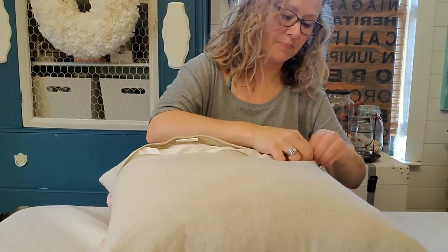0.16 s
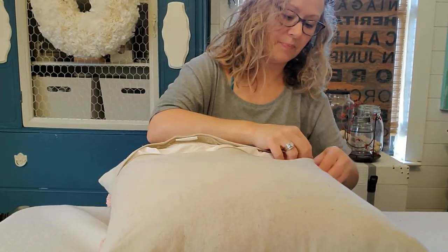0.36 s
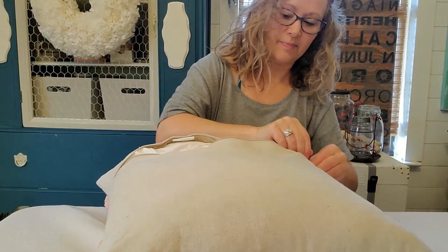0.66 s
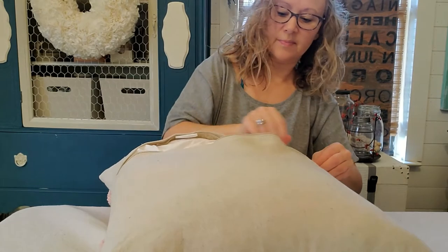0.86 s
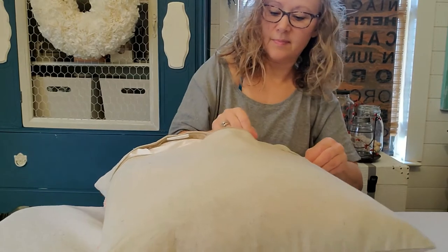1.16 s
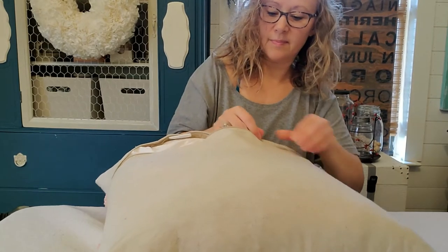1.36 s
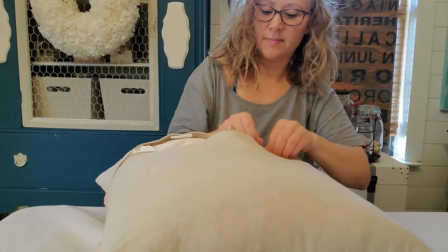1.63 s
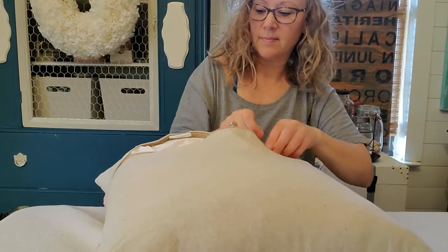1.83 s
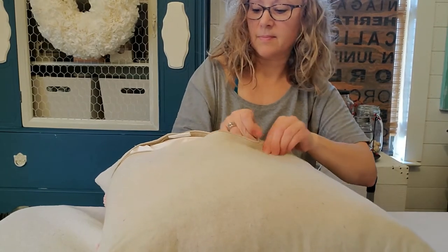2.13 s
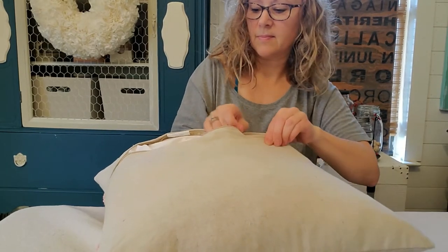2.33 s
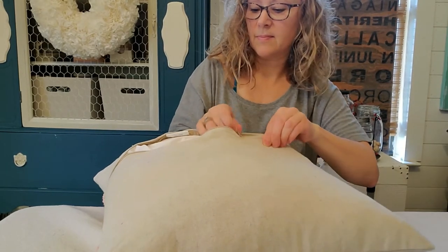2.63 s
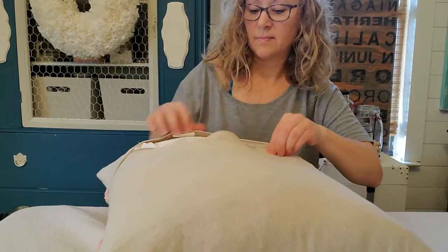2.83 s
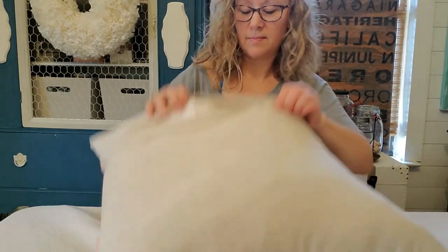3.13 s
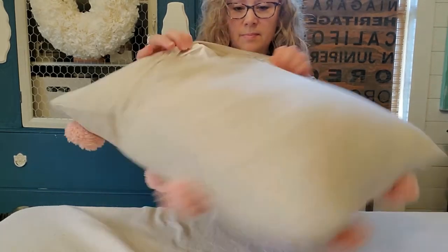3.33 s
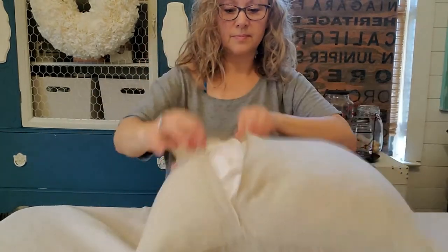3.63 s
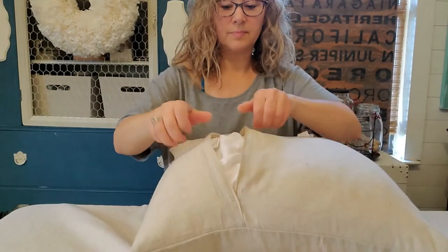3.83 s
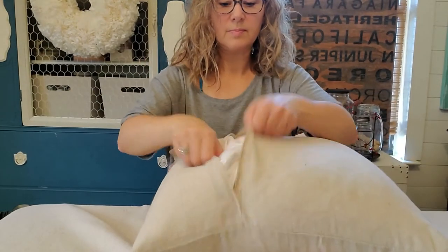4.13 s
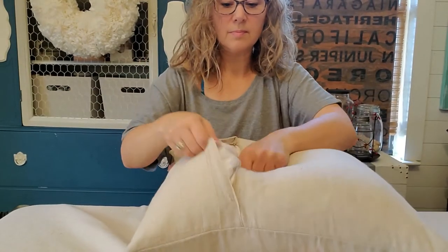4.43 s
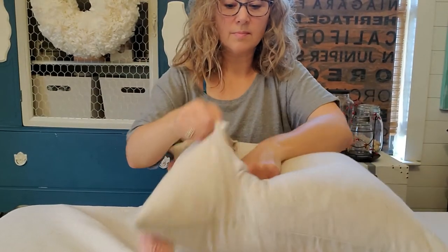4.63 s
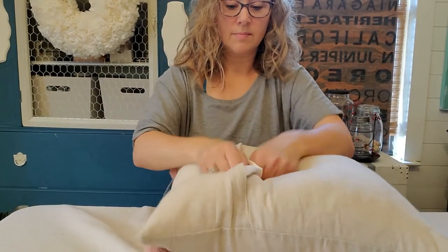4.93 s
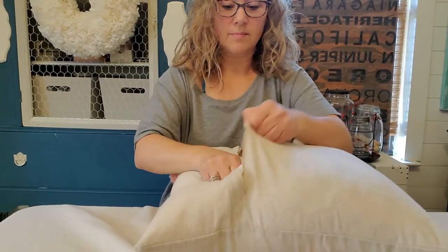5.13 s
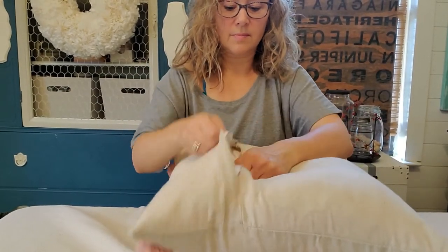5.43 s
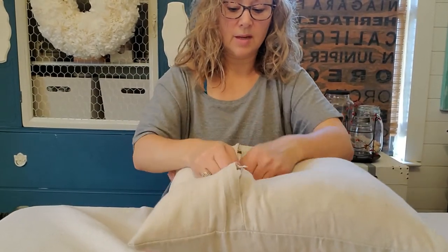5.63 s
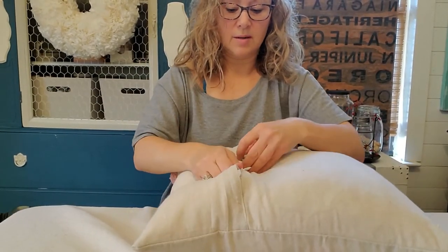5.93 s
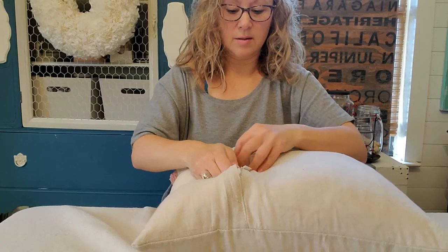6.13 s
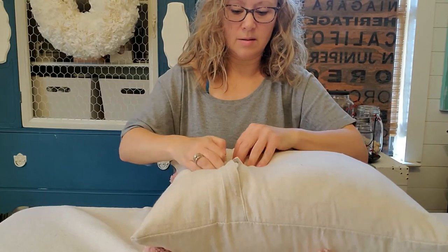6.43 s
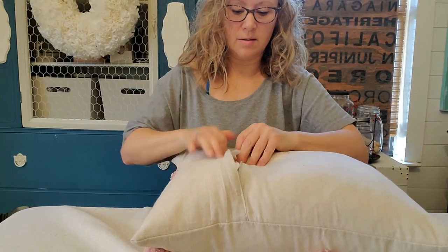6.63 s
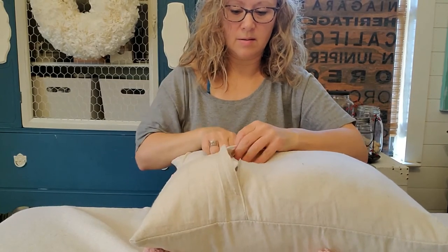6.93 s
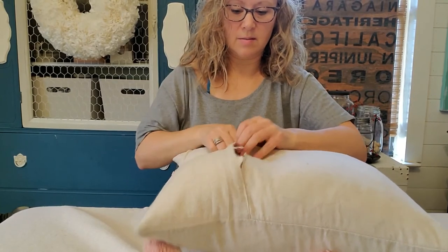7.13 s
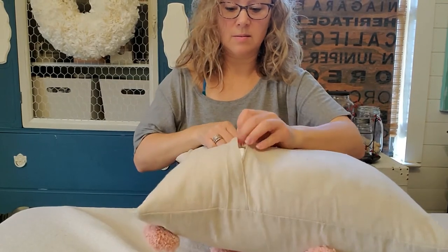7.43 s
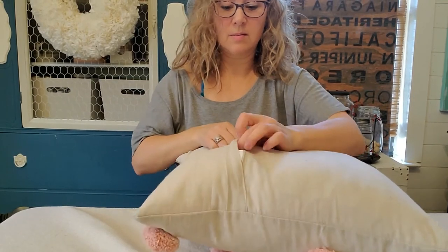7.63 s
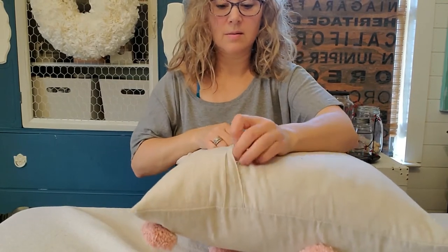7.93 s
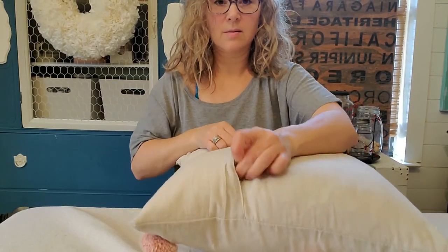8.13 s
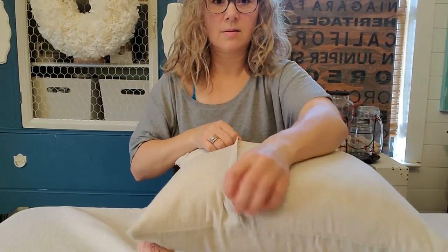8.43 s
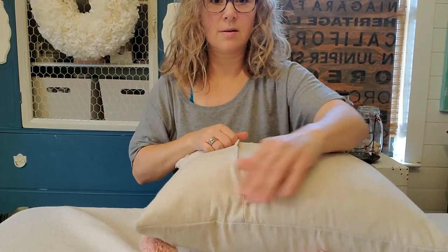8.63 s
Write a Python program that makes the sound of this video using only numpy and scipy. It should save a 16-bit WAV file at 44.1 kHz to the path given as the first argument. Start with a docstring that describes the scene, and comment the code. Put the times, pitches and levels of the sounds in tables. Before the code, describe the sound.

Close to the microphone in a small quiet room, a zipper on a stuffed pillow cover zips in a quick rising stroke, then short stuttering tugs. The pillow drops on a table with a deep, soft thump and puff of air. Hands rub, pat and tick at the fabric, then three more short zips follow, ending with a muffled pat and brushing sweep.

```python
"""A zipper on a stuffed pillow cover is pulled shut in short strokes, in a small room.
Each tooth clicks in the slider and plucks the taut cloth; a fast, even pull also sings at the tooth rate.
Hands hiss and rub over the cover as shaped noise, folds rustle as narrow noise bands, pats are decaying sines.
At 3.6 s the pillow drops on the table, whose modes boom; a faint hum and moving air lie behind."""
import sys
import numpy as np
from scipy import signal
from scipy.fft import rfft, irfft, next_fast_len
from scipy.io import wavfile
from scipy.ndimage import map_coordinates

SR = 44100
rng = np.random.default_rng(int(sys.argv[2]) if len(sys.argv) > 2 else 0)


def generate_wav(sig):
    """Save sig (samples, or channels by samples) to the path in sys.argv[1] as 16-bit PCM at SR."""
    pcm = np.round(np.clip(np.atleast_2d(sig).T, -1, 1) * 32767).astype(np.int16)
    wavfile.write(sys.argv[1], SR, pcm)


N = 386316

# colour of the clicking teeth and tab: (frequency [Hz], level [dB])
TEETH_COLOUR = [(200, -6.5), (900, 3.5), (1800, -5), (2600, -3), (3900, 1), (5000, -3.5), (6500, -3.5),
                (8200, -8), (12500, -5), (16000, -12.5)]
# colour of air and cloth brushed by a blow: (frequency [Hz], level [dB])
PUFF_COLOUR = [(40, -3), (170, -2.5), (420, 0), (700, -8.5), (1500, -21), (4000, -27), (9000, -28.5),
               (16000, -37)]
GRAB_S = 0.0081  # the slider starts and stops within this time


def amp(db):
    """Decibels to gain."""
    return 10 ** (np.asarray(db) / 20)


def unit(x):
    """x at rms 1."""
    return x / np.sqrt(np.mean(x ** 2) + 1e-20)


def along(points, hz):
    """(Hz, value) points interpolated on a log frequency axis."""
    f, v = np.transpose(points)
    return np.interp(np.log(hz + 1), np.log(f + 1), v)


def curves(rows):
    """One value per sample for each column after the time."""
    s, *cols = np.transpose(rows)
    return [np.interp(np.arange(N) / SR, s, c) for c in cols]


def wobble(rate_hz):
    """A smooth random curve with rate_hz knots a second."""
    knots = rng.standard_normal(int(N * rate_hz / SR) + 4)
    return map_coordinates(knots, [np.arange(N) * rate_hz / SR])


def add(track, s, sound):
    """Mix a sound into a track from time s."""
    part = track[round(s * SR):][:len(sound)]
    part += sound[:len(part)]


def coloured(x, spectrum, size=4096):
    """x through a minimum-phase filter of energy 1 with the given spectrum."""
    cepstrum = irfft(np.log(amp(along(spectrum, np.fft.rfftfreq(size, 1 / SR)))))
    cepstrum[1:size // 2] *= 2  # fold onto the causal half
    cepstrum[size // 2 + 1:] = 0
    kernel = irfft(np.exp(rfft(cepstrum)))
    return signal.oaconvolve(x, kernel / np.linalg.norm(kernel))[:len(x)]


def noise(spectrum):
    """Coloured noise of rms 1."""
    return coloured(rng.standard_normal(N), spectrum)


def split(x, edge_hz):
    """The parts of x below and above an edge."""
    low = signal.sosfiltfilt(signal.butter(2, edge_hz, fs=SR, output="sos"), x)
    return low, x - low


def pulses(at, sizes):
    """Impulses at fractional sample positions (windowed sinc)."""
    taps = np.floor(at)[:, None].astype(int) + np.arange(16) - 7
    offset = taps - at[:, None]
    shape = np.sinc(offset) * np.sinc(offset / 8)
    return np.bincount(np.clip(taps, 0, N - 1).ravel(), (sizes[:, None] * shape).ravel(), N)


def diffuse(pair):
    """Two unrelated signals as they reach the microphones from all sides: alike in the bass only."""
    # left-right likeness: (frequency [Hz], correlation [0-1])
    likeness = [(100, 0.92), (250, 0.92), (500, 0.75), (1000, 0.16), (3000, 0)]
    length = pair.shape[1]
    m = next_fast_len(length)
    turn = np.arccos(np.clip(along(likeness, np.fft.rfftfreq(m, 1 / SR)), -1, 1)) / 2
    mid, side = irfft(rfft(pair, m) * [np.cos(turn), np.sin(turn)], m)[:, :length]
    return np.array([mid + side, mid - side])


def diffuse_noise(spectrum):
    """Coloured noise from all sides."""
    return diffuse(np.array([noise(spectrum), noise(spectrum)]))


def room(x, wet_db, early_db=6, early_t60_s=0.0082):
    """Direct sound, dense early reflections and a short tail, drawn anew for each short part."""
    # decay of the tail: (frequency [Hz], t60 [s])
    walls = [(100, 0.35), (400, 0.33), (1500, 0.35), (4000, 0.34), (14000, 0.27)]
    out, hop = np.zeros((2, N)), SR // 12
    hz, t, z = signal.stft(rng.standard_normal((2, 3 * SR)), SR, nperseg=256)
    t = t[t < .25]
    decay = amp(-60 * t / along(walls, hz)[:, None]) + amp(early_db - 60 * t / early_t60_s)
    fade = np.sin(np.pi * np.arange(2 * hop) / (2 * hop))
    for start in range(0, N - hop // 2, hop):
        part = x[start:start + 2 * hop]
        pick = rng.integers(z.shape[2] - len(t))
        if np.abs(part).max() < 1e-5:
            continue
        tail = diffuse(signal.istft(z[..., pick:pick + len(t)] * decay, SR, nperseg=256)[1])
        tail *= 1 - np.exp(-np.arange(tail.shape[1]) / SR / 0.00095)
        tail /= np.linalg.norm(tail, axis=1, keepdims=True)
        for ear, answer in zip(out, tail):
            add(ear, start / SR, signal.fftconvolve(part * fade[:len(part)], answer))
    return x + amp(wet_db) * out


def placed(pair):
    """The sound reaches the nearer microphone first."""
    # hands along the seam: (time [s], lead of the left microphone [s])
    hands = [(.8, -.00005), (2.2, -.00003), (3, .00007), (7.1, .00002)]
    lead_s, = curves(hands)
    now, shift = np.arange(N), lead_s * SR / 2
    left = map_coordinates(pair[0], [now + shift])
    right = map_coordinates(pair[1], [now - shift])
    return np.array([left, right])


def slips(rows, width_octaves, grain_db):
    """Short swells of stick and slip: grainy noise in a band at each fold's pitch."""
    out, grit = np.zeros(N), rng.standard_normal(N) * amp(grain_db * wobble(600))
    for s, length_s, db, hz in rows:
        edges_hz = hz * 2 ** (np.array([-.5, .5]) * width_octaves)
        band = signal.butter(2, edges_hz, "bandpass", fs=SR, output="sos")
        begin = s - length_s / 2
        part = signal.sosfilt(band, grit[round(begin * SR):][:round(length_s * SR)])
        add(out, begin, amp(db) * unit(part * np.hanning(len(part))))
    return out


def room_tone(hum_hz=121.3, hum_db=-65, air_db=-63):
    """Faint moving air and the wavering hum of an appliance."""
    # colour of the air: (frequency [Hz], level [dB])
    air_colour = [(25, -18), (60, -3.5), (110, 18), (165, -11), (280, -13), (600, -37), (1200, -10.5),
                  (2800, -41), (4500, -29), (7000, -19.5), (9000, -28), (16000, -42)]
    hum = np.sin(2 * np.pi * hum_hz * np.arange(N) / SR + .4 * wobble(5))
    return amp(air_db) * diffuse_noise(air_colour) + amp(hum_db) * hum


def sweeping():
    """Each sweep of a hand swells and fades: the gains of its hiss and of its rubbing."""
    # hand sweeps: (fastest moment [s], rise [s], fall [s], hiss level [dB])
    sweeps = [(0.56, 0.16, 0.32, -60.5), (1.22, 0.066, 0.073, -67), (1.95, 0.22, 0.12, -64),
              (2.78, 0.068, 0.1, -58.5), (3.162, 0.16, 0.088, -50.5), (3.34, 0.063, 0.075, -59),
              (3.54, 0.08, 0.17, -60), (3.78, 0.15, 0.033, -60), (4.019, 0.056, 0.061, -53.5),
              (4.19, 0.23, 0.11, -51), (4.389, 0.07, 0.1, -47.5), (4.635, 0.085, 0.094, -46.5),
              (4.98, 0.22, 0.21, -50.5), (5.37, 0.12, 0.097, -51.5), (5.69, 0.18, 0.17, -54),
              (6.271, 0.25, 0.097, -57), (6.6, 0.14, 0.31, -61.5), (6.92, 0.26, 1, -65),
              (8.15, 0.095, 0.16, -51), (8.68, 0.14, 0.062, -44)]
    shape = 1.53  # 1 is a pointed swell, 2 a rounded one
    rub_mean_db, rub_follows = -61, 0.54  # rub of an average sweep; its share of the hiss's change in dB
    rub_outlasts = 1.28  # the stuffing gives for this many times as long as the hand slides
    rest_hiss_db, rest_rub_db = -74, -69  # resting hands are never quite still
    t = np.arange(0, N, 64) / SR
    hiss_power, rub_power = amp(rest_hiss_db) ** 2, amp(rest_rub_db) ** 2
    average_db = np.mean(np.transpose(sweeps)[-1])
    for s, rise_s, fall_s, hiss_db in sweeps:
        rub_db = rub_mean_db + rub_follows * (hiss_db - average_db)
        away = np.maximum((s - t) / rise_s, (t - s) / fall_s)
        hiss_power = hiss_power + (amp(hiss_db) * np.exp(-away ** shape)) ** 2
        rub_power = rub_power + (amp(rub_db) * np.exp(-(away / rub_outlasts) ** shape)) ** 2
    return curves(np.transpose([t, np.sqrt(hiss_power), np.sqrt(rub_power)]))


def creases(per_s=22, scatter_db=4):
    """Small folds of the cover snap over at random, as decaying noise bursts; rms 1."""
    # colour of a snapping fold: (frequency [Hz], level [dB])
    crease_colour = [(300, -17), (1500, -5.5), (3200, -9.5), (5500, -6), (9000, -9.5), (16000, -14.5)]
    count = int(per_s * N / SR)
    sizes = amp(scatter_db * np.clip(rng.standard_normal(count), -2, 2))
    snaps = np.bincount(rng.integers(N, size=count), sizes, N)
    t = np.arange(SR // 20) / SR
    flutter = rng.standard_normal(len(t)) * amp(-60 * t / 0.034)
    return unit(coloured(signal.oaconvolve(snaps, flutter)[:N], crease_colour))


def cloth(fibre_db=2.0, flutter_db=1.4, direct_db=-9, crease_db=-10):
    """Skin slides over the weave: a hiss of catching fibres above a dull, uneven rubbing."""
    # colour of the fibres: (frequency [Hz], level [dB])
    hiss_colour = [(200, -2.5), (700, 1.5), (1400, 0), (2000, 1), (3100, 0), (5000, -2), (7000, -2.5),
                   (9000, -6.5), (13000, -6), (16000, -10)]
    # colour of the rubbing: (frequency [Hz], level [dB])
    rub_colour = [(30, -21.5), (60, 3), (140, 4), (230, 2.5), (480, -0.5), (800, -8.5), (1500, -15),
                  (6000, -74)]
    sliding, pressing = sweeping()
    fibres = coloured(unit(rng.standard_normal(N) * amp(fibre_db * wobble(900))), hiss_colour)
    hiss = amp(direct_db) * fibres + diffuse_noise(hiss_colour) + amp(crease_db) * creases()
    rub = diffuse_noise(rub_colour)
    grip_db = flutter_db * wobble(35)
    lumps_db = 2.2 * wobble(25)
    return sliding * amp(grip_db) * hiss + pressing * amp(4.5 + grip_db + lumps_db) * rub


def rustles():
    """Cloth and zipper tape skid under the fingers by stick and slip."""
    # skids: (middle [s], length [s], level [dB], pitch [Hz])
    skids = [(0.97, 0.16, -43, 3400), (4.536, 0.01, -52.5, 4800), (4.567, 0.027, -54.5, 5300),
             (5.05, 0.17, -65, 3080), (5.491, 0.012, -61, 3230), (7.108, 0.1, -47.5, 4540)]
    return slips(skids, width_octaves=0.58, grain_db=6.0)


def table_ring(attack_s):
    """The table's modes swell under a padded blow and die away."""
    # table modes: (frequency [Hz], level [dB], t60 before any damping [s])
    modes = [(60.7, 3, 0.48), (113, -20, 0.95), (200, -32, 0.67), (385, -14.5, 0.47)]
    t = np.arange(SR) / SR
    ring = sum(amp(db - 60 * t / t60_s) * np.sin(2 * np.pi * hz * t) for hz, db, t60_s in modes)
    return ring * (1 - np.exp(-t / attack_s))


def pats(pat_t60_s=0.035, brush_t60_s=0.13):
    """A pat is a dead knock in the stuffing with a brush of cloth, and stirs the table."""
    # hands pat and press: (time [s], level [dB], pitch [Hz], table boom re level [dB])
    blows = [(0.474, -42.5, 334, -30), (2.624, -44.5, 477, -27), (3.501, -45.5, 171, -21),
             (4.617, -30, 230, -21), (4.948, -35.5, 480, -22), (5.059, -38.5, 418, -16),
             (5.247, -36.5, 194, -17), (5.356, -40, 219, -14.5), (5.721, -43.5, 440, -9.5),
             (5.916, -37.5, 206, -36), (6.146, -38.5, 203, -32), (6.576, -41, 260, -42),
             (6.942, -33, 291, -56), (7.575, -45.5, 243, -31), (8.674, -27, 200.4, -36)]
    out, brush, t = np.zeros(N), np.zeros(N), np.arange(SR) / SR
    rise = 1 - np.exp(-t / 0.0012)
    for s, db, hz, boom_db in blows:
        add(out, s, amp(db - 60 * t / pat_t60_s) * rise * np.sin(2 * np.pi * hz * t))
        # the resting hand damps the table by 37 dB/s
        add(out, s, amp(db + boom_db + 5.0 - 37 * t) * table_ring(attack_s=0.011))
        add(brush, s, amp(db - 11.5 - 60 * t / brush_t60_s) * rise * rng.standard_normal(len(t)))
    return out + coloured(brush, PUFF_COLOUR)


def landing(puff_t60_s=0.35, puff_rise_s=0.03):
    """The pillow's soft pushes set the table booming while air puffs out of the cover."""
    # pillow lands and settles: (time [s], push level [dB], push length [s])
    pushes = [(3.619, -19.5, 0.0019), (3.631, -19.5, 0.0015)]
    out, puff, t = np.zeros(N), np.zeros(N), np.arange(SR) / SR
    for s, db, length_s in pushes:
        u = t / length_s - 4  # push centred on s
        add(out, s - 4 * length_s, amp(db) * (u * u - 1) * np.exp(-u * u / 2))
    touch_s = pushes[0][0] - .003
    add(out, touch_s, amp(-18.0) * table_ring(attack_s=0.036))
    slap = amp(-30.0 - 60 * t / 0.0082)
    sigh = amp(-24.5 - 60 * t / puff_t60_s) * (1 - np.exp(-t / puff_rise_s))
    add(puff, touch_s, (slap + sigh) * rng.standard_normal(len(t)))
    return out + room(coloured(puff, PUFF_COLOUR), wet_db=-2.0)


def tab(tick_t60_s=0.003):
    """Pull tab and fingernails tick: very short cracks of noise."""
    # ticks: (time [s], level [dB])
    ticks = [(1.099, -39), (2.8047, -41), (4.05, -33), (4.212, -36), (4.339, -37), (4.3753, -30),
             (4.4102, -30), (4.6187, -28.5), (6.245, -42), (6.9891, -36), (7.285, -26), (7.983, -34.5),
             (8.522, -56), (8.646, -45)]
    out, t = np.zeros(N), np.arange(SR // 20) / SR
    for s, db in ticks:
        crack = rng.standard_normal(len(t)) * amp(-60 * t / tick_t60_s)
        add(out, s, amp(db + 13.0) * crack / np.linalg.norm(crack))
    return coloured(out, TEETH_COLOUR)


def judders():
    """The cover judders by stick and slip where the pull tugs at it."""
    # tugs: (middle [s], length [s], level [dB], pitch [Hz])
    tugs = [(0.714, 0.052, -41, 250), (0.77, 0.085, -41, 630), (0.91, 0.26, -46.5, 320),
            (1.578, 0.017, -37, 387), (7.17, 0.097, -35.5, 540), (7.625, 0.037, -39.5, 320),
            (7.659, 0.029, -35, 322), (8.238, 0.033, -34.5, 544)]
    return slips(tugs, width_octaves=0.52, grain_db=3.0)


def shaded(x, sizzle_db):
    """Fingers over the slider change the level of its highest sizzle."""
    dull, sizzle = split(x, edge_hz=5550)
    return dull + amp(sizzle_db) * sizzle


def slackened(x, slack_db):
    """A slack seam flaps more widely and sounds deeper than a stretched one."""
    flap, rest = split(x, edge_hz=314)
    return amp(slack_db) * flap + rest


def current_pull():
    """The columns of the pull in progress, one value per sample."""
    # the hand pulls the slider: (start [s], speeding up [s], running [s], slowing [s],
    # slowest nominal tooth rate [Hz], fastest nominal tooth rate [Hz], plucked cloth [dB], tooth click [dB],
    # slider body [dB], time until the teeth bite fully [s], sizzle [dB], slack of the seam [dB],
    # slider rattle [dB], roughness [0-1])
    pulls = [(0.674, 0.099, 0.16, 0.12, 112.1, 791.4, -31.5, -28, 4, 0.12, -7, 5, -30, 0.67),
             (1.493, 0.074, 0.03, 0.052, 112.1, 225.7, -42.5, -55, 0, 0.0059, -3, 3.5, -16, 0.89),
             (1.756, 0.0091, 0.028, 0.016, 225.4, 342.6, -43, -54.5, -3.5, 0.0053, 2, -5, -14, 0.77),
             (2.15, 0.021, 0.021, 0.072, 161.1, 330, -34.5, -37, 7, 0.0046, -0.5, 0.5, -24, 0.59),
             (2.271, 0.012, 0.049, 0.0064, 101.6, 104, -29, -34.5, 4, 0.001, -10.5, -6, -16, .12),
             (7.072, 0.1, 0.075, 0.065, 269.8, 718.9, -30.5, -38, 6.5, 0.013, -5.5, 7.5, -11.5, 0.19),
             (7.606, 0.105, 0.06, 0.11, 140.1, 386, -36.5, -41, 5, 0.053, -6.5, 4, -13.5, 0.69),
             (8.134, 0.077, 0.018, 0.047, 214.6, 519.7, -35, -42, 3.5, 0.0036, -5.5, -0.5, -21, 0.65)]
    columns = np.transpose(pulls)
    begun = np.searchsorted(columns[0] - GRAB_S, np.arange(N) / SR)
    return columns[:, np.maximum(begun - 1, 0)]


def slider(age_s, rise_s, run_s, fall_s, slowest_hz, fastest_hz):
    """A pull speeds up, runs and slows down: teeth per second, and how hard they pluck and click."""
    pluck_db_per_octave, click_db_per_octave = 3.5, 2  # a slower slider is quieter
    pluck_ease_db, click_ease_db = 8, 7.5  # the pull eases off as the stroke ends
    slowing = np.clip((age_s - rise_s - run_s) / fall_s, 0, 1)
    octaves = np.log2(fastest_hz / slowest_hz) * (np.clip(age_s / rise_s, 0, 1) - slowing - 1)
    left_s = rise_s + run_s + fall_s - age_s
    moving = np.clip(1 + np.minimum(age_s, left_s) / GRAB_S, 0, 1)
    force = moving * amp(pluck_db_per_octave * octaves - pluck_ease_db * slowing ** 2)
    bite = moving * amp(click_db_per_octave * octaves - click_ease_db * slowing ** 2)
    return fastest_hz * 2 ** octaves, force, bite


def teeth(speed_hz, start_s, rough, jitter=0.168, pluck_scatter_db=6.5, click_scatter_db=5.5, uneven_db=1.5):
    """Teeth pass the slider one by one, from the two rows in turn: their count so far, plucks and clicks."""
    # the hand's speed trembles, and the rougher the pull, the less alike the teeth let go
    passed = np.cumsum(speed_hz * amp(.35 * wobble(70))) / SR
    passed = passed - passed[(start_s * SR).astype(int)]  # each pull begins with a tooth
    at = np.flatnonzero(np.diff(np.floor(passed)) > 0)
    chance = np.clip(rng.standard_normal((len(at), 3)), -1.6, 1.6) * rough[at, None]
    period = SR / speed_hz[at]  # samples
    at = np.clip(at + jitter * period * chance[:, 0], 0, N - 1)
    # at speed one row bites harder: a growl an octave down
    row = (-1.) ** np.arange(len(at)) * np.clip(SR / period / 500, 0, 1)
    pluck_sizes = np.sqrt(period) * amp(uneven_db * row + pluck_scatter_db * chance[:, 1])
    click_sizes = np.sqrt(period) * amp(click_scatter_db * chance[:, 2])
    return passed, pulses(at + 0.000988 * SR, pluck_sizes), pulses(at, click_sizes)


def zipper(pluck_db=-3.0, click_db=-6, whine_db=-6, knock_db=-19.5, scrape_db=-8.5, stretch_db=-10,
           loose_db=-24):
    """Each tooth clicks, knocks the slider and plucks the cloth; the slider scrapes more the faster it runs."""
    # slider jerks over a stiff tooth: (time [s], level [dB], click re level [dB], rattle re level [dB])
    snags = [(1.057, -34.5, -7, 10), (1.505, -31, -20, 4.5), (1.595, -33, -32, -9),
             (1.606, -32.5, -30, -10), (2.23, -29.5, -15, 7), (2.395, -27.5, -16, -14),
             (2.448, -31, -28, -4), (7.655, -27, -8, 2)]
    catch_s, catch_db = 0.01, -8  # second catch after each snag
    # colour of the taut cloth: (frequency [Hz], level [dB])
    taut_colour = [(40, -6.5), (110, -6), (200, 1.5), (330, 3.5), (520, 2), (760, -3), (1000, -11),
                   (1400, -14), (2200, -21), (16000, -73.5)]
    # colour of the seam stretched by a fast pull: (frequency [Hz], level [dB])
    stretched_colour = [(300, -21.5), (600, 4.5), (780, 0.5), (1150, -8), (1500, -21), (4000, -60)]
    # colour of the slider body: (frequency [Hz], level [dB])
    slider_colour = [(200, -14), (700, 2.5), (1300, -4), (2000, -5), (3000, -6.5), (6000, -10.5),
                     (16000, -18.5)]
    # colour of the slider rattle: (frequency [Hz], level [dB])
    rattle_colour = [(600, -12.5), (1600, -0.5), (2300, -3), (3500, -13), (16000, -59)]

    (start_s, rise_s, run_s, fall_s, slowest_hz, fastest_hz, pull_db, bite_db,
     body_db, bite_s, sizzle_db, slack_db, rattle_db, rough) = current_pull()
    age_s = np.arange(N) / SR - start_s
    speed_hz, force, bite = slider(age_s, rise_s, run_s, fall_s, slowest_hz, fastest_hz)
    biting = np.clip((age_s + GRAB_S) / bite_s, 0, 1) ** 3
    force = force * amp(pull_db)
    bite = bite * biting * amp(bite_db)

    passed, plucks, clicks = teeth(speed_hz, start_s, rough)
    rattles = amp(pluck_db + rattle_db) * force * biting * clicks
    plucks = amp(pluck_db) * force * plucks
    clicks = amp(click_db) * bite * clicks
    for s, db, bright_db, ring_db in snags:
        for at_s, size_db in (s, db), (s + catch_s, db + catch_db):
            i = round(at_s * SR)
            plucks[i] += amp(size_db + 18.5)
            clicks[i] += amp(size_db + bright_db + 19)
            rattles[i] += amp(size_db + ring_db + 4.5)
    plucks = split(plucks, edge_hz=46)[1]  # keep the plucks free of rumble below 46 Hz

    # at speed even plucks run together and the taut seam sings at the tooth rate
    running = np.clip(speed_hz / 350, 0, 1) ** 2
    tone = np.sin(2 * np.pi * passed + .5 * wobble(200))
    whine = force * running * (1 - rough) * amp(whine_db + 7.5 * wobble(90)) * tone
    # a fast pull stretches the seam, which rings higher
    stretch = amp(stretch_db) * coloured(plucks * np.clip(speed_hz / 600, 0, 1), stretched_colour)
    # the cloth is muffled and the slider's body sounds only faintly until the teeth bite
    dull, snap = split(coloured(plucks, taut_colour), edge_hz=1600)
    plucked = slackened(dull + biting * snap, slack_db)
    body = amp(body_db + loose_db * (1 - biting))
    knock = amp(knock_db) * coloured(body * plucks, slider_colour)
    scrape = body * force * running * amp(scrape_db + 1.6 * wobble(500)) * noise(slider_colour)

    seam = whine + judders() - plucked - knock - stretch
    metal = shaded(coloured(clicks, TEETH_COLOUR) + scrape, sizzle_db) + coloured(rattles, rattle_colour)
    return room(seam, wet_db=-1.5) + room(metal, wet_db=2.5, early_db=14)


def scene():
    """Everything but the room tone happens on the table, close to the microphones."""
    pulled = amp(-2) * (zipper() + room(tab(), wet_db=-7))
    handled = cloth() + room(rustles(), wet_db=-3, early_db=12)
    near = pulled + handled + room(pats(), wet_db=2.5) + landing()
    balance_db = [[.6], [-.6]]  # left, right
    return placed(near) * amp(balance_db) + room_tone()


def record(dry, top_hz=15900):
    """Band limit: nothing passes above top_hz."""
    m = next_fast_len(N + SR // 2)
    return irfft(rfft(dry, m) * (np.fft.rfftfreq(m, 1 / SR) < top_hz), m)[:, :N]


dry = scene()
out = record(dry)
generate_wav(out)
```